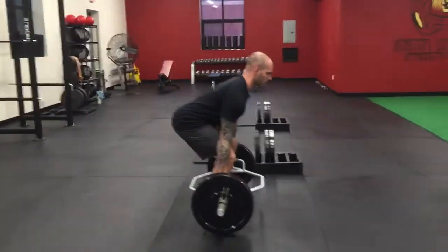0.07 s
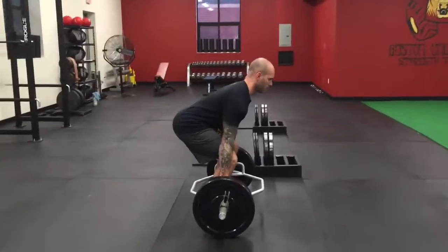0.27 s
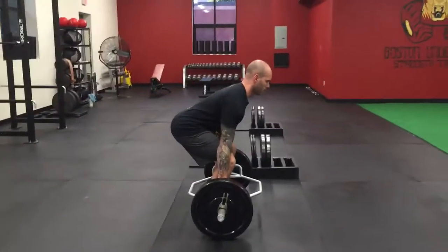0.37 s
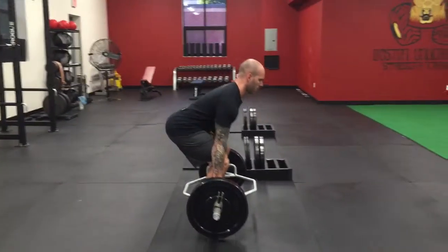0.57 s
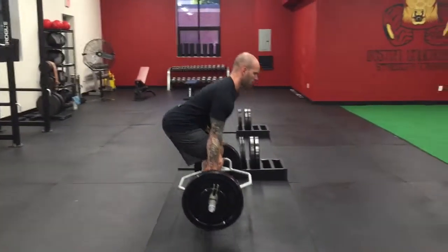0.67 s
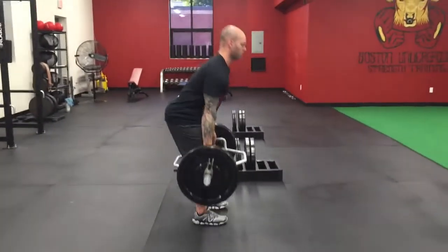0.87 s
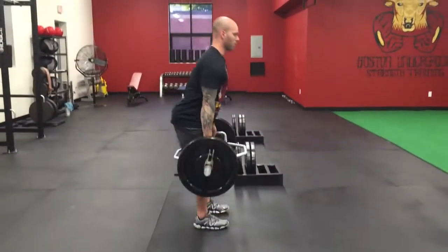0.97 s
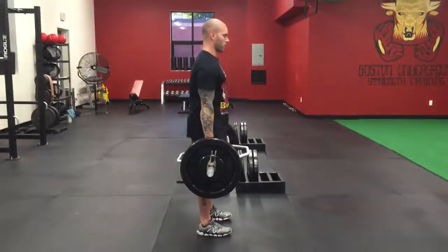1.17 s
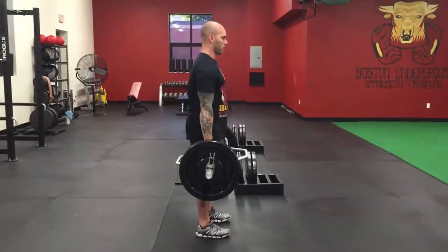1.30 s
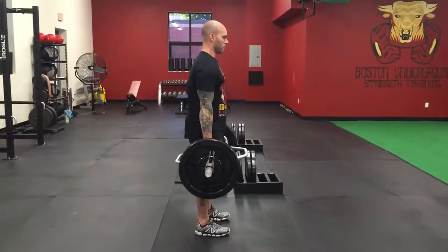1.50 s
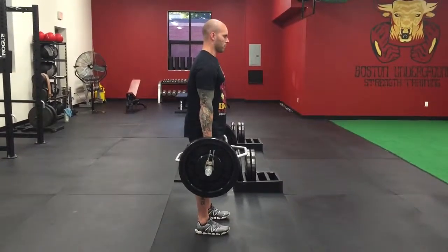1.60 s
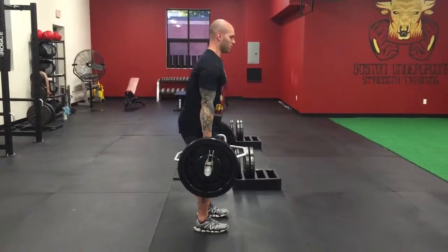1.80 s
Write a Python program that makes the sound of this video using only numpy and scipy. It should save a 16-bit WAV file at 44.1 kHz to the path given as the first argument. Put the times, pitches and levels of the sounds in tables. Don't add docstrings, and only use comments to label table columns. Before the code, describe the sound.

A loaded weight bar lands on a rubber gym floor. Ventilation rumbles throughout, and a low duct hum swells until about 0.2 s, then cuts out. At 0.22 s one plate touches, and at 0.24 s comes the deep, heavy thud with short iron clanks. Wall slaps and fainter clanks follow at 0.3-0.45 s, while the large bare hall rings and fades. Phone microphone a few metres away.

```python
import sys
import numpy as np
from scipy import signal
from scipy.fft import rfft, irfft, next_fast_len
from scipy.io import wavfile

SR = 44100
rng = np.random.default_rng(int(sys.argv[2]) if len(sys.argv) > 2 else 0)


def how_loud(loudness_db):
    steps = np.asarray(loudness_db, float) / 20
    return 10 ** steps


def waveform_to_disk(signal):
    frames = np.transpose(np.atleast_2d(signal))
    scaled = np.clip(frames, -1, 1) * 32767
    samples = np.round(scaled).astype(np.int16)
    wavfile.write(sys.argv[1], SR, samples)


N = 81585
T = np.arange(N) / SR

# start in seconds, level in dB, push length in seconds, share of deep boom from 0 to 1.
THUDS = [
    (0.2227, -9, 0.00073, 0.4),
    (.2352, 2, 0.0013, 0.98),
    (.2400, -1.5, 0.0013, 0.28),
    (.2462, -5.5, 0.0017, 0.2),
    (.3150, -14.5, .0018, .1),
    (0.327, -6.5, 0.0025, 0.49),
    (0.343, -9, 0.0027, 0),
    (.4450, -10.5, 0.0028, .4),
]
LANDING_S = THUDS[1][0]


def table(rows, hz):
    rows = np.array(rows, float)
    return np.interp(np.log(hz), np.log(rows[:, 0]), rows[:, 1])


def unit(x):
    return x / np.sqrt(np.mean(x ** 2))


def band(hz, width):
    size = next_fast_len(N + SR // 4)
    f = np.arange(size // 2 + 1) * SR / size
    spectrum = rfft(rng.standard_normal(size)) * np.exp(-((f - hz) / width) ** 2)
    return unit(irfft(spectrum, size)[:N])


def walk(rate):
    return band(0, rate)


def ring(modes, t, gain):
    hz, db, t60 = np.array(modes, float)[:, :3].T[:, :, None]
    decay = np.exp(-np.log(1000) * t / t60)
    return np.sum(gain * how_loud(db) * np.sin(2 * np.pi * hz * t) * decay, axis=0)


def air():
    # frequency in Hz, level in dB per Hz.
    hiss_levels = [(190, -1.5), (285, -15), (716, -26), (1090, -26), (1760, -29), (3900, -30.5),
                   (4600, -35.5), (15500, -45)]
    # frequency in Hz, width in Hz, level in dB.
    booms = [(58, 29, -56.5), (108, 50, -54.5), (164.7, 46, -59.5)]
    noise = 0
    for hz in 200 * 2 ** np.arange(0, 6.4, 1 / 5):
        db = table(hiss_levels, hz) + 10 * np.log10(hz) + 0.74 * walk(3.1)
        noise = noise + how_loud(db) * band(hz, hz / 10)
    rumble = sum(how_loud(db + 1.7 * walk(2.7)) * band(hz, width / 2) for hz, width, db in booms)
    return how_loud(-61.5) * unit(noise) + rumble


def drone():
    # time in seconds, pitch in Hz, level in dB.
    glide = [
        (0.0, 110, -44),
        (0.164, 110, -38.5),
        (0.192, 108, -39),
        (0.222, 101, -49),
    ]
    s, hz, db = np.array(glide, float).T
    stop = np.exp(-np.maximum(T - s[-1], 0) / 0.006)
    phase = 2 * np.pi * np.cumsum(np.interp(T, s, hz)) / SR
    return np.sqrt(2) * how_loud(np.interp(T, s, db)) * stop * np.sin(phase)


def thuds():
    # frequency in Hz, level in dB, t60 in seconds, side of the node the phone is on (1 or -1).
    slab = [(52.2, -21.5, 0.39, 1), (62.8, -29.5, 0.95, -1), (77.35, -34.5, 0.6, -1),
            (108.9, -18, 0.24, -1)]
    rubber = [(256.7, -29.5, 0.11, 1), (288.4, -26, 0.16, 1), (318, -18, 0.075, -1), (419, -31, 0.053, 1)]
    pushes = []
    for s, db, length, _ in THUDS:
        half_sine = np.sin(np.pi * np.clip((T - s) / length, 0, 1))
        pushes.append(how_loud(db) * np.pi / (2 * length * SR) * half_sine)
    pushes = np.array(pushes)
    deep = np.clip(np.array(THUDS)[:, 3], 0, 1)

    def struck(push, modes):
        side = np.sign(np.array(modes)[:, 3:])
        return signal.fftconvolve(push, ring(modes, T, side))[:N]

    return struck(deep @ pushes, slab) + struck(pushes.sum(axis=0), rubber)


def clanks():
    # start in seconds, level in dB, brightness in dB.
    knocks = [(0.2248, -42, -24), (.2296, -36.5, -12), (.2352, -33.5, -10), (.2374, -26, 4.5),
              (.2455, -33.5, -1.5), (.2548, -27, 0.1), (0.262, -32, -3), (.2690, -36, -2), (.3030, -39, -8),
              (.3365, -33.5, -1), (.3450, -38.5, -18), (0.353, -36.5, -12)]
    # frequency in Hz, level in dB, t60 in seconds.
    iron_modes = [(540, -2.5, 0.029), (844, -2, 0.028), (1013, -5, 0.019), (1120, -10, 0.044),
                  (1450, -16, 0.025), (1610, -5.5, 0.014), (1973, 0, .018), (2185, -3.5, 0.026),
                  (2516, 0, 0.012), (4440, -19.5, .012), (5640, -1.5, 0.0082), (6310, -4, .01),
                  (9460, -11, .006), (11330, -9, 0.0062)]
    low_hz, top_hz, rise_s, crack_s, crack_db = 4440, 10500, 0.00024, 0.00046, 6.5
    t = T[:SR // 8]
    rise = 1 - np.exp(-t / rise_s)
    high = np.array(iron_modes)[:, :1] > low_hz
    crack_band = signal.butter(2, [low_hz, top_hz], "band", fs=SR, output="sos")
    out = np.zeros(N)
    for s, db, bright_db in knocks:
        draw = rng.standard_normal((len(iron_modes), 2))
        gain = how_loud(bright_db * high + 2.3 * draw[:, 1:]) * np.sign(draw[:, :1])
        iron = ring(iron_modes, t, gain) * rise
        crack = signal.sosfilt(crack_band, rng.standard_normal(len(t))) * np.exp(-t / crack_s) * rise
        i = int(s * SR)
        out[i:i + len(t)] += how_loud(db) * (0.9 * iron + how_loud(crack_db + bright_db) * crack)
    return out


def hall():
    # frequency in Hz, t60 in seconds.
    ring_times = [(50, 0.4), (150, 1.5), (300, 1.24), (600, 0.96), (1100, 1.27), (2200, 1.11), (6000, 1.0),
                  (14000, 0.42)]
    # frequency in Hz, level in dB.
    strengths = [(40, 6.5), (200, -11), (310, -5), (490, -13.5), (1050, -17.5), (2400, -17.5),
                 (2900, -28.5), (6460, -32), (11000, -40.5), (15000, -55)]
    # frequency in Hz, seconds for the fed power to double.
    feed_times = [(200, 0.62), (600, 0.02), (1100, 0.01), (2200, 0.023), (4000, 0.17), (12000, 0.3)]
    level_at_s, build_s, patchy_db, low_hz = 0.1, 0.0029, 1.4, 110
    u = np.maximum(T - LANDING_S, 0)
    out = 0
    for hz in 40 * 2 ** np.arange(0, 8.7, 1 / 5):
        feed = table(feed_times, hz)
        db = table(strengths, hz) + 10 * np.log10(hz / 300)
        db = db - 60 * (u - level_at_s) / table(ring_times, hz) + patchy_db * walk(17.4)
        fed = np.sqrt((feed + u) / (feed + level_at_s))
        bass_loss = min(hz / low_hz, 1) ** 2
        out = out + how_loud(db) * fed * bass_loss * band(hz, hz / 10)
    return how_loud(-37.5) * out * (1 - np.exp(-u / build_s))


def linger():
    # frequency in Hz, width in Hz, level in dB, t60 in seconds.
    tones = [(960, 52, -45, 1.77), (1090, 94, -45, 2), (57, 12, -41, 1.0), (301, 34, -44, 0.85)]
    u = np.maximum(T - LANDING_S, 0)
    out = sum(how_loud(db - 60 * u / t60) * band(hz, width / 2) for hz, width, db, t60 in tones)
    return out * (1 - np.exp(-u / 0.043))


def scene():
    return (air() + drone() + thuds() + clanks() + hall() + linger())[None]


def roll_off(x):
    return signal.sosfilt(signal.butter(12, 16020, fs=SR, output="sos"), x)


def record(dry):
    low_hz, top_hz = 34.6, 15100
    x = signal.sosfilt(signal.butter(2, low_hz, "high", fs=SR, output="sos"), dry)
    x = signal.sosfilt(signal.cheby1(8, 0.3, top_hz, fs=SR, output="sos"), x)
    return roll_off(x)


dry = scene()
out = record(dry)
waveform_to_disk(out)
```